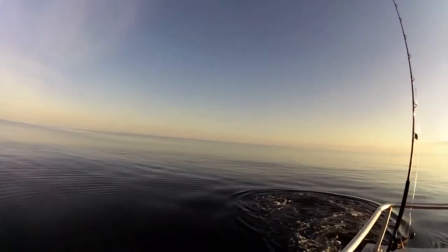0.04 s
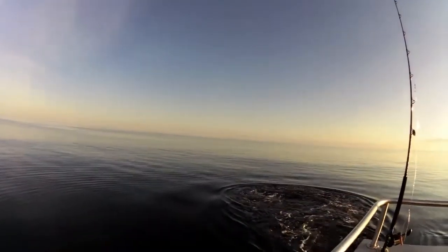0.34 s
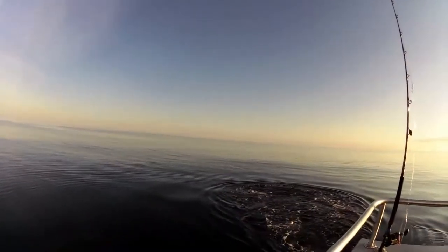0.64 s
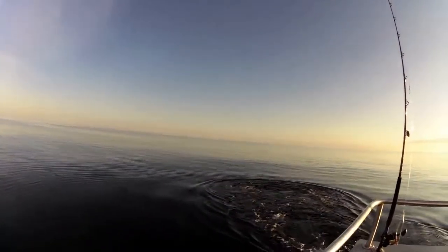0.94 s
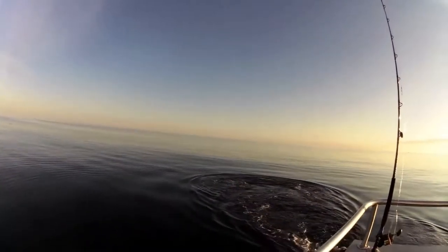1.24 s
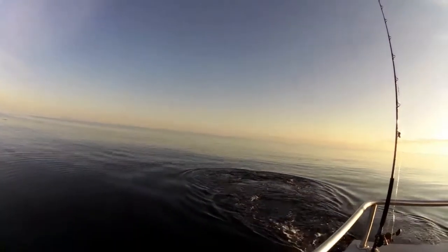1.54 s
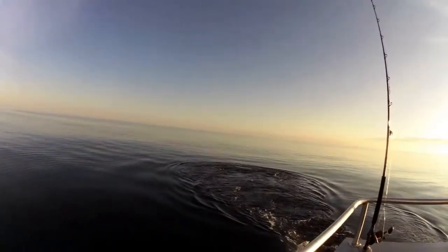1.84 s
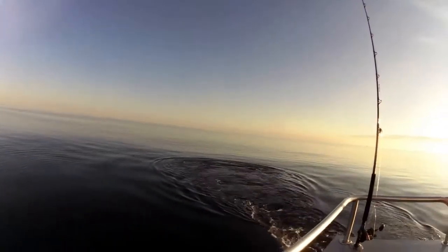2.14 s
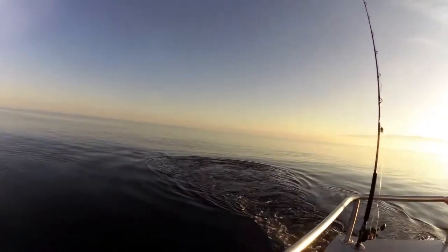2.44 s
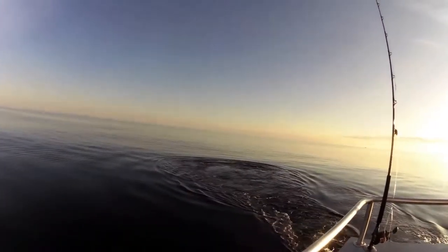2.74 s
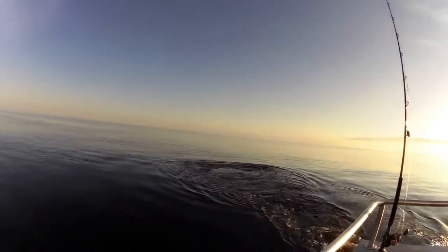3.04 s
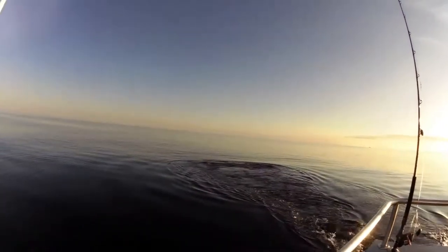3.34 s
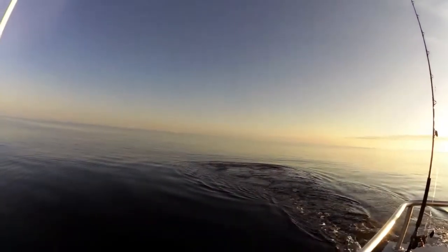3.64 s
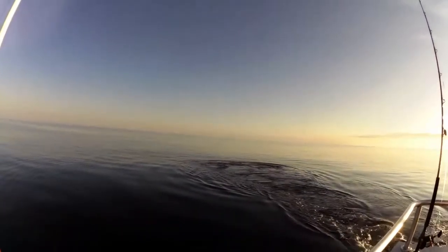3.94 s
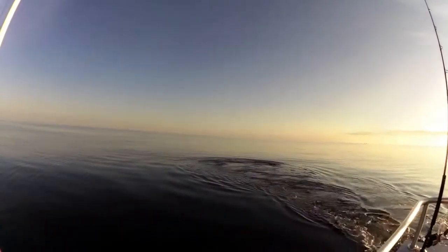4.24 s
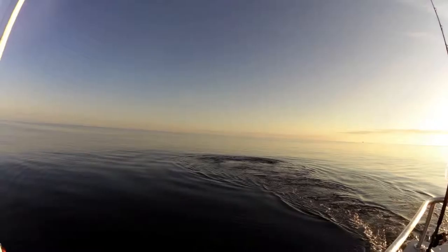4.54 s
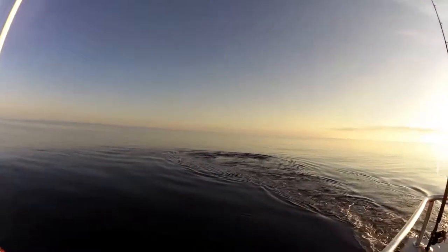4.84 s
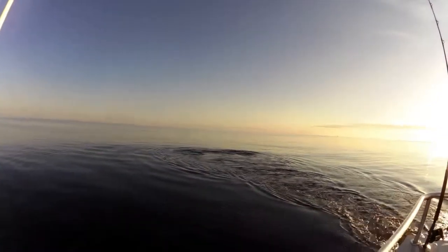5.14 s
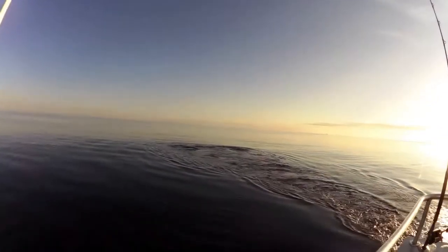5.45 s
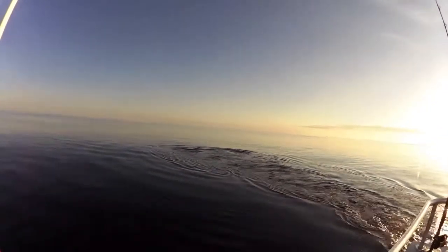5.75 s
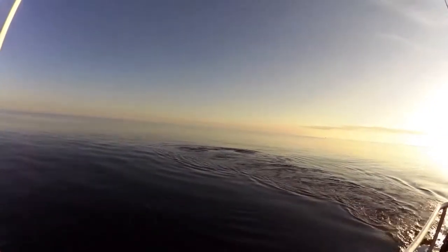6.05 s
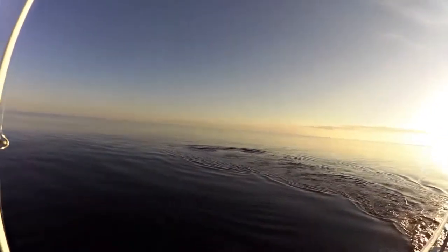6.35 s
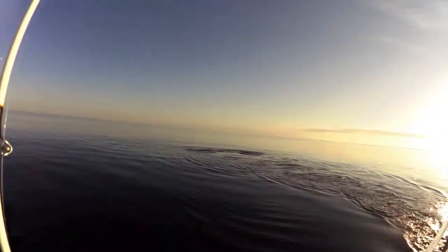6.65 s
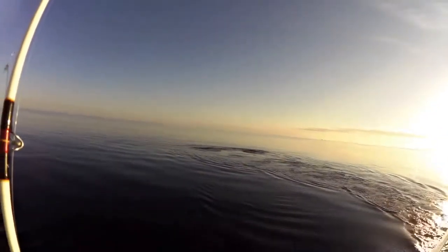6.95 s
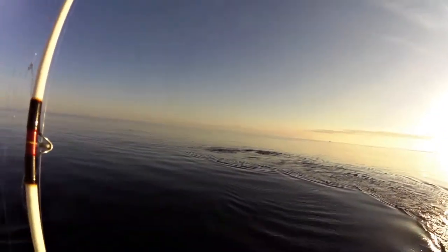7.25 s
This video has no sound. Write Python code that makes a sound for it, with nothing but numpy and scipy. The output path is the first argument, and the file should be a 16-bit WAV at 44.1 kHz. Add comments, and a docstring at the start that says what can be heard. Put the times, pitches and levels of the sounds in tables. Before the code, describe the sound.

Heard from the back of a fishing boat on open water, the engine hums and lopes slowly, with a light clatter and a thin whine. Small splashes fizz in the wake and large bubbles glug once. In the last couple of seconds the engine revs up, then revs up again, droning and burbling loudly in the water as a few short tones ring and the boat gets under way.

```python
"""A fishing boat's eight-cylinder engine lopes at low speed on calm water, heard from the stern.
The wake splashes, and about a second in the exhaust glugs once as large bubbles ring.
From 5.3 s the throttle opens in two steps: the firings quicken, the exhaust drones and its gas
burbles loudly through the churning water. Brief tones ring as the boat gathers way,
and the throttle eases slightly at the very end."""
import sys
import numpy as np
from scipy import signal
from scipy.fft import rfft, irfft, next_fast_len
from scipy.io import wavfile

SR = 44100
rng = np.random.default_rng(int(sys.argv[2]) if len(sys.argv) > 2 else 0)


def to_wav(s):
    """Save 16-bit WAV."""
    ch = np.atleast_2d(s).T  # columns
    pcm = np.round(np.clip(ch, -1, 1) * 32767)  # PCM
    wavfile.write(sys.argv[1], SR, pcm.astype(np.int16))


N = 326781
TIME_S = np.arange(N) / SR


def amp(db):
    """Decibels to gain."""
    return 10 ** (np.asarray(db) / 20)


def unit_rms(x):
    """Scales to rms 1."""
    return x / np.sqrt(np.mean(x ** 2) + 1e-20)


def colour(x, spectrum, resonances=()):
    """Filters by a smooth spectrum with resonances on top; rms 1."""
    size = next_fast_len(N + SR // 4)
    hz = np.fft.rfftfreq(size, 1 / SR)
    freq_hz, gain_db = np.transpose(spectrum)
    db = np.interp(np.log(hz + 1), np.log(freq_hz), gain_db)
    for centre_hz, width_hz, lift_db in resonances:
        db += lift_db / (1 + (2 * (hz - centre_hz) / width_hz) ** 2)
    return unit_rms(irfft(rfft(x, size) * amp(db), size)[:N])


def wander(rate_hz):
    """Smooth random drift up to rate_hz; rms 1."""
    count = 2048
    hz = np.fft.rfftfreq(count, TIME_S[-1] / count)
    slow = irfft(rfft(rng.standard_normal(count)) / (1 + (hz / rate_hz) ** 4))
    return np.interp(TIME_S, np.linspace(0, TIME_S[-1], count), unit_rms(slow))


def cyclic_noise(cycle, rough):
    """A random pattern that repeats every engine cycle, plus fresh noise."""
    size = 8192
    pattern = irfft(np.exp(2j * np.pi * rng.random(size // 2 + 1)))
    looped = np.interp(cycle % 1 * size, np.arange(size), pattern)
    return unit_rms(looped) + rough * rng.standard_normal(N)


def lagged(x, lag_s):
    """First-order lag."""
    pole = np.exp(-1 / (lag_s * SR))
    return signal.lfilter([1 - pole], [1, -pole], x)


def load_gain(load, idle_db, half_db, full_db):
    """Gain between idle, half and full load."""
    return amp(np.interp(load, [0, .5, 1], [idle_db, half_db, full_db]))


# freq_hz, gain_db
WASH_SPECTRUM = [(20, -21.5), (45, -8), (70, -1.5), (150, -3), (300, -3), (600, -6.5), (1100, -21),
                 (1800, -35.5), (3000, -30), (6000, -48.5), (12000, -66.5)]

def wash(level_db=-47):
    """The wake runs along the hull as a low, steady noise."""
    return amp(level_db) * colour(rng.standard_normal(N), WASH_SPECTRUM)


def droplets(rate_per_s=2000, low_hz=2010, high_hz=5000, decay_cycles=13, spread_db=3, sizes=28):
    """A crowd of tiny bubbles, each ringing for a few cycles."""
    age_s, out = np.arange(1024) / SR, np.zeros(N)
    for hz in np.geomspace(low_hz, high_hz, sizes):
        pops = rng.random(N) < rate_per_s / sizes / SR
        strength = amp(spread_db * np.minimum(rng.exponential(1, N), 3))
        ring = np.exp(-age_s * hz / decay_cycles) * np.sin(2 * np.pi * hz * age_s)
        out += signal.oaconvolve(pops * strength, ring)[:N]
    return unit_rms(out)


# freq_hz, gain_db
FOAM_SPECTRUM = [(800, -19), (1800, -11.5), (2500, -3), (3100, 3.5), (3800, -1), (4500, -12), (5400, -22.5),
                 (8000, -31), (12000, -42.5)]

def foam(drops, load, swell_db=.5):
    """Spray and foam fizz, louder above half load."""
    fizz = colour(.33 * drops + .9 * rng.standard_normal(N), FOAM_SPECTRUM)
    return load_gain(load, -65.5, -65.5, -62) * amp(swell_db * wander(5.8)) * fizz


# freq_hz, gain_db
SPLASH_SPECTRUM = [(1000, -6), (2200, -8.5), (3000, -0.5), (3800, 2), (4500, -9), (5400, -7), (9000, -14.5)]
# centre_s, level_db, half_length_s
WAKE_SPLASHES = [(0.337, -61.5, 0.055), (.54, -70, .07), (1.018, -70, .07), (1.224, -61.5, .01),
                 (1.468, -62, 0.03), (1.655, -66, 0.04), (2.018, -64.5, 0.076), (2.573, -66, .05),
                 (2.73, -65.5, .06), (2.947, -70, .024), (4.383, -70, .045), (4.893, -70, 0.075)]

def splashes(drops):
    """Each splash in the wake throws up a cloud of droplets."""
    power = np.zeros(N)
    for centre_s, level_db, half_length_s in WAKE_SPLASHES:
        power += amp(level_db) ** 2 * np.exp(-((TIME_S - centre_s) / half_length_s) ** 2)
    return np.sqrt(power) * colour(drops, SPLASH_SPECTRUM)


# centre_s, peak_db, pitch_hz, half_length_s, glide_share_per_s
RING_TONES = [(6.22, -67, 2220, .05, 0), (6.25, -39, 270, .12, 0), (6.69, -65, 2562, .05, 0),
              (6.79, -24, 197, .03, 0), (6.895, -36, 607, .05, -.05), (6.89, -62, 3580, .07, -.7)]

def rings(jitter_rad=.5):
    """Short, slightly ragged tones swell and fade."""
    out = np.zeros(N)
    for centre_s, peak_db, pitch_hz, half_length_s, glide in RING_TONES:
        offset_s = TIME_S - centre_s
        envelope = amp(peak_db) * np.exp(-(offset_s / half_length_s) ** 2)
        turns = pitch_hz * offset_s * (1 + glide * offset_s / 2)
        out += envelope * np.sin(2 * np.pi * turns + jitter_rad * wander(pitch_hz / 20))
    return out


# start_s, peak_db, pitch_hz, t60_s
BUBBLES = [(.317, -56.5, 3980, .03), (0.965, -20, 160, 0.066), (.968, -31, 578, .11),
           (1.001, -22.5, 195, .24), (1.245, -40.5, 678, 0.25), (1.676, -55, 2450, .04),
           (2, -53.5, 2500, 0.07), (2.001, -51, 3850, .04), (2.939, -55, 2690, .045)]

def glugs(wobble_rad=.77, rise_share=.053, climb_per_t60=.027):
    """Single bubbles ring, wobble and rise in pitch as they near the surface."""
    out = np.zeros(N)
    for start_s, peak_db, pitch_hz, t60_s in BUBBLES:
        age_s = np.maximum(TIME_S - start_s, 0)
        rise_s = rise_share * t60_s
        attack = np.minimum(age_s / rise_s, 1)
        decay = amp(-60 * np.maximum(age_s - rise_s, 0) / t60_s)
        turns = pitch_hz * age_s * (1 + climb_per_t60 * age_s / t60_s / 2)
        out += amp(peak_db) * attack * decay * np.sin(2 * np.pi * turns + wobble_rad * wander(60))
    return out


# cycle_order, base_db
BELT_TONES = [(53.2, -50.5), (60.35, -48.5), (64, -58.5), (134.1, -63.5)]
# time_s, gain_db
BELT_GAIN = [(.6, 3), (2.2, 0), (3.1, 2), (3.9, -3.5), (5.2, 0.5), (6.8, -6)]

def belt_whine(cycle, waver=.5, slip_rad=.29):
    """Pump and alternator sing at fixed ratios of engine speed; their belt slips a little."""
    out = np.zeros(N)
    for order, base_db in BELT_TONES:
        angle = 2 * np.pi * (order * cycle + rng.random()) + slip_rad * wander(9.7)
        out += amp(base_db) * (1 + waver * wander(16)) * np.sin(angle)
    gain_db = np.interp(TIME_S, *np.transpose(BELT_GAIN))
    return np.sqrt(2) * amp(gain_db) * out


# freq_hz, gain_db
CHUFF_SPECTRUM = [(200, -18), (285, 13.5), (345, 1), (450, -22), (570, -9), (690, -8), (800, -1), (935, 1),
                  (1000, -16), (1200, -29.5), (3000, -62)]

def chuff(cycle, base_db=-49, peak_phase=.63):
    """One side of the engine blows harder: a hollow swell once a cycle."""
    swell = 1 + .72 * np.cos(2 * np.pi * (cycle - peak_phase))
    return amp(base_db) * colour(swell * cyclic_noise(cycle, rough=1.1), CHUFF_SPECTRUM)


# freq_hz, gain_db
HOUSING_SPECTRUM = [(100, -37.5), (185, -4.5), (240, -6.5), (285, 2), (335, -5.5), (420, -3), (520, -13),
                    (660, -13.5), (770, -19.5), (900, -23.5), (1050, -23.5), (1500, -35.5), (2200, -42.5),
                    (5000, -79.5)]
# centre_hz, width_hz, lift_db
PANEL_MODES = [(342, 14, -1), (444.3, 10, 4), (900, 40, 5.5)]

def block(cycle, lope, base_db=-40, lope_depth=.64):
    """Pistons and valves clatter through the housing and its panels, louder on strong cylinders."""
    clatter = lope ** lope_depth * cyclic_noise(cycle, rough=.9)
    return amp(base_db) * colour(clatter, HOUSING_SPECTRUM, PANEL_MODES)


# freq_hz, gain_db
BURBLE_SPECTRUM = [(25, -48), (50, -32.5), (75, -7), (105, -13.5), (140, -2), (200, 5), (280, -0.5),
                   (350, -8.5), (480, -15.5), (600, -23.5), (1000, -25), (1600, -44), (4000, -90)]

def burble(cycle, firings, lope, load, decay_firings=.66, steady=.43, churn_db=1, lope_depth=.63):
    """Every firing blows a puff of gas that breaks up in the water."""
    puffs = steady + np.exp(-(firings % 1) / decay_firings)
    flow = lope ** lope_depth * puffs * amp(churn_db * wander(23))
    gas = colour(flow * cyclic_noise(cycle, rough=.75), BURBLE_SPECTRUM)
    return load_gain(load, -53, -34, -31) * gas


# firing_hz, gain_db
HUM_GAIN = [(54, -1), (61, 0.5), (68, -13), (73.5, 6), (78, -12.5)]
# cycle_order, hum_base_db, drone_base_db
EXHAUST_TONES = [(5, -78, -54), (8, -40, -37.5), (9, -53, -51), (10, -54, -53), (11, -52, -48),
                 (12, -54, -49), (13, -61, -40.5), (14, -58, -35.5), (15, -62, -32), (16, -51, -36.5),
                 (17, -56, -40), (18, -49, -37), (19, -48, -41), (20, -65, -45), (21, -50, -38.5),
                 (22, -60, -46), (23, -57, -51), (24, -57, -47), (25, -60, -42), (26, -60, -46),
                 (27, -56, -46), (28, -63, -53)]

def exhaust(cycle, firing_hz, load, hum_waver=.17, drone_waver=.27):
    """Unequal cylinders put tones on multiples of the cycle rate; water at the outlet shakes them."""
    hum_gain = amp(np.interp(firing_hz, *np.transpose(HUM_GAIN)))  # peaks at the pipe's resonance
    drone_gain = load_gain(load, -30, -13, 0)
    out = np.zeros(N)
    for order, hum_base_db, drone_base_db in EXHAUST_TONES:
        hum, drone = amp(hum_base_db) * hum_gain, amp(drone_base_db) * drone_gain
        shake = (hum_waver * hum + drone_waver * drone) * (.5 if order <= 8 else 1)
        angle = 2 * np.pi * (order * cycle + rng.random())
        out += (hum + drone + shake * wander(5.4)) * np.cos(angle)
        out += shake * wander(5.3) * np.sin(angle)
    return np.sqrt(2) * out


# start_s, length_s, change_share
LEVER_MOVES = [(5.27, .51, .58), (6.55, .23, .42), (7.2, .2, -.07)]

def lever():
    """Throttle opening, 0 at idle and 1 at full; each move starts gently."""
    return sum(change * np.clip((TIME_S - start_s) / length_s, 0, 1) ** 2
               for start_s, length_s, change in LEVER_MOVES)


# strength_db, in firing order
CYLINDER_DB = [1.5, -3.5, 1, 2, -2, 1, 2, -1.5]

def crankshaft(throttle, idle_hz=54.28, full_hz=78.3, inertia_s=.08):
    """The firing rate lags the lever; strong and weak cylinders make the engine lope."""
    cylinders = len(CYLINDER_DB)
    firing_hz = idle_hz + (full_hz - idle_hz) * lagged(throttle, inertia_s)
    firings = np.cumsum(firing_hz) / SR + .012 * wander(4)
    lope = amp(np.interp(firings, np.arange(cylinders), CYLINDER_DB, period=cylinders))
    return firing_hz, firings, firings / cylinders, lope


def scene():
    """The throttle sets speed and load; one crankshaft times the engine's sounds over the wake."""
    throttle = lever()
    load = lagged(throttle, lag_s=.025)
    firing_hz, firings, cycle, lope = crankshaft(throttle)
    tones = exhaust(cycle, firing_hz, load) + belt_whine(cycle)
    clatter = load_gain(load, -.5, 3, 3.5) * (block(cycle, lope) + chuff(cycle))
    gas = burble(cycle, firings, lope, load)
    drops = droplets()
    wake = foam(drops, load) + wash() + splashes(drops)
    return (tones + clatter + gas + wake + glugs() + rings())[None]


def record(dry, cutoff_hz=12300):
    """Steep low-pass on the top treble."""
    taps = signal.firwin(511, cutoff_hz, window=("kaiser", 9), fs=SR)
    return signal.oaconvolve(dry, taps[None], "same", axes=1)


dry = scene()
out = record(dry)
to_wav(out)
```